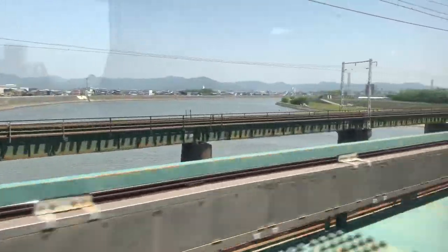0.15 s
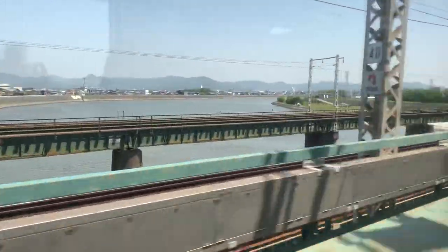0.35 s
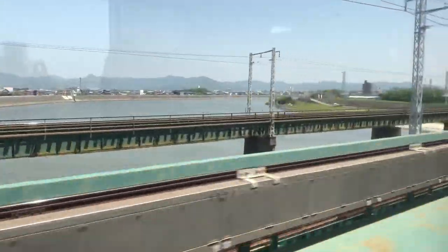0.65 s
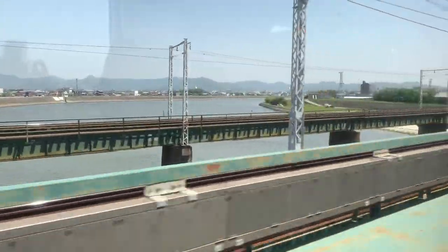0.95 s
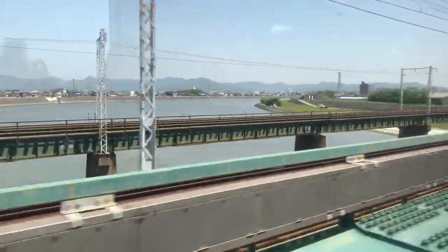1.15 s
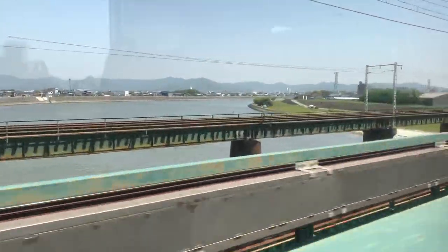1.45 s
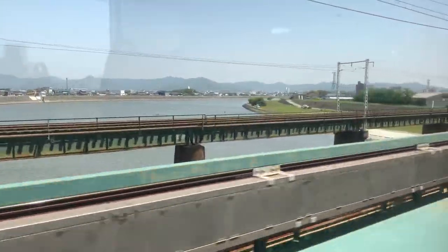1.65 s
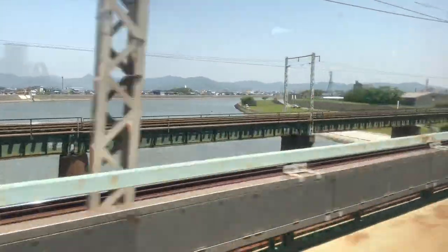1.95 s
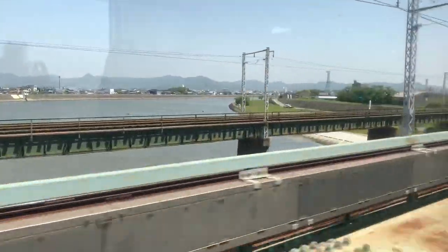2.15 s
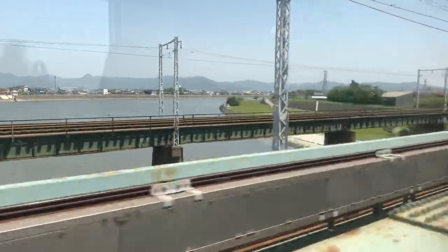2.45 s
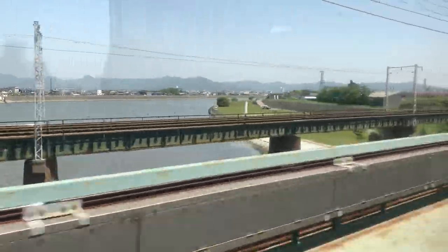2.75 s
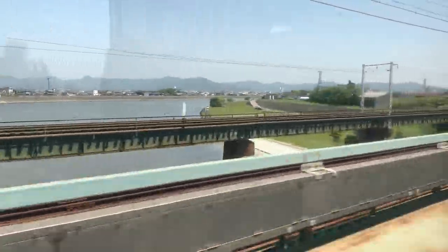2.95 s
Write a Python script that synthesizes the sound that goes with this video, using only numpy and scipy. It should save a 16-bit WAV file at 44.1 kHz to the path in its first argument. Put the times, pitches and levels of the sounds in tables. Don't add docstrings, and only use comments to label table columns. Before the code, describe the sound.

Continuous loud train rumble inside a carriage on a steel bridge, about 3 seconds without a break: deep hollow girder boom, low humming body drone and rough wheel roar. Rounded knocks swell several times a second, strongest near 1.2 and 2.5 s, with short dull plate rings. Faint bright rail hiss lies above; tiny squeaks come around 1.0-1.1, 1.7-2.0 and 2.5-2.6 s, rattling ticks near 0.86, 2.58 and 2.89 s.

```python
import sys
import numpy as np
from scipy import signal
from scipy.fft import rfft, irfft, next_fast_len
from scipy.io import wavfile
from scipy.ndimage import uniform_filter1d, map_coordinates

SR = 44100
rng = np.random.default_rng(int(sys.argv[2]) if len(sys.argv) > 2 else 0)


def inscribe(sig):
    pcm = np.round(np.clip(np.atleast_2d(sig).T, -1, 1) * 32767)
    wavfile.write(sys.argv[1], SR, pcm.astype(np.int16))


def amplitude_ratio(level_db):
    exponent = np.asarray(level_db, float) / 20
    return 10 ** exponent


N = 136710


def unit(x):
    return x / np.sqrt(np.mean(x ** 2) + 1e-20)


def along(points, hz):
    f, level_db = np.transpose(points)
    return np.interp(np.log(hz + 1), np.log(f + 1), level_db, -120, -120)


def wobble(rate):
    knots = rng.standard_normal(int(N * rate / SR) + 4)
    return map_coordinates(knots, [np.arange(N) * rate / SR])


def filtered(x, response):
    m = next_fast_len(N + 8192)
    return irfft(rfft(x, m) * response(np.fft.rfftfreq(m, 1 / SR)), m)[..., :N]


def rush(mid_db, side_db, side_over_db, link, turn, patchy_db):
    z = signal.stft(rng.standard_normal((2, N)), nperseg=512)[2]
    patches = uniform_filter1d(rng.standard_normal(z.shape[1:]), 5, axis=0)
    patches = uniform_filter1d(patches, 10, axis=1)
    shared, own = signal.istft(z * amplitude_ratio(patchy_db * unit(patches)), nperseg=512)[1][:, :N]
    link = np.clip(link, 0, 1)

    def side_tone(hz):
        return amplitude_ratio(along(side_db, hz))

    mid = unit(filtered(shared, lambda hz: amplitude_ratio(along(mid_db, hz))))
    side = link * filtered(shared, lambda hz: side_tone(hz) * np.exp(1j * turn))
    side = side + np.sqrt(1 - link ** 2) * filtered(own, side_tone)
    side = amplitude_ratio(side_over_db) * unit(side)
    return np.array([mid + side, mid - side])


def two_sides(x):
    lag_s, turn_rad = .000178, 3.7

    def half_turn(hz):
        return .5 * (turn_rad - 2 * np.pi * hz * lag_s)

    return filtered(x, lambda hz: np.exp(1j * np.array([half_turn(hz), -half_turn(hz)])))


# t/s, boom level/dB, roar level/dB, hiss level/dB
JOINTS = [(.17, -4, -0.5, -4), (.27, -3.5, -0.5, 3.5), (.4, -4.5, 4, 2), (.53, -2, -11, -6),
          (.7, -0.5, -0.5, -5), (.91, -5.5, -2.5, 5), (1.022, -3, 3, 8.5), (1.179, 1.5, 3, 7),
          (1.27, -8, -4, 1), (1.4, -9, -4, -13), (1.669, -2, 3.5, 6), (1.822, -6.5, 1.5, 5),
          (1.92, -2.5, -0.5, 3.5), (2.222, -3, -4, -5), (2.462, 1, -1.5, 3.5), (2.551, -12, -4, 4.5),
          (2.659, -3, -2, -6), (2.82, -1, -11, -15)]


def knocks(column, dies_s):
    lead_s, rise_s = .038, .04
    rows = np.array(JOINTS)
    since = np.maximum(np.arange(N) / SR - rows[:, :1] + lead_s, 0)
    swell = (1 - np.exp(-since / rise_s)) ** 2 * np.exp(-since / dies_s)
    return 5 * amplitude_ratio(2 * rows[:, column]) @ swell


def roar_lift():
    return knocks(column=2, dies_s=.08)


# f/Hz, level/dB per Hz
BOOM = [(39, -23.5), (66, -1), (91, -6), (140, -2), (183, -2.5), (259, -13), (280, -22), (360, -45),
        (620, -120)]
BOOM_SIDE = [(39, -23), (66, -3), (97, -2), (150, 8), (264, -18), (280, -2.5), (360, -40), (620, -120)]


def girder_boom():
    noise = rush(BOOM, BOOM_SIDE, -12.5, link=.94, turn=2.36, patchy_db=-.7)
    return amplitude_ratio(-20.5) * np.sqrt(1 + knocks(column=1, dies_s=.13)) * noise


# middle t/s, length t/s, f/Hz, peak level/dB
RINGS = [(0.03, 0.1, 190, -18), (0.07, 0.12, 115, -16), (0.232, 0.16, 565.0, -25.0),
         (0.276, 0.2, 624.0, -26.0), (0.313, 0.09, 183.0, -15.0), (0.418, 0.12, 614.0, -26.0),
         (0.424, 0.09, 441.0, -23.0), (0.424, 0.1, 318.0, -20.0), (0.424, 0.19, 183.0, -14.0),
         (0.488, 0.1, 140.0, -15.0), (0.496, 0.08, 307.0, -20.0), (0.496, 0.2, 199.0, -16.0),
         (0.7, 0.1, 318.0, -21.0), (0.836, 0.12, 145.0, -14.0), (0.94, 0.1, 200, -16),
         (1.054, 0.1, 598.0, -25.0), (1.077, 0.1, 199.0, -14.0), (1.112, 0.2, 140.0, -14.0),
         (1.19, 0.1, 275.0, -18.0), (1.196, 0.09, 145.0, -11.0), (1.213, 0.17, 393.0, -23.0),
         (1.248, 0.19, 668.0, -26.0), (1.254, 0.1, 172.0, -13.0), (1.265, 0.2, 318.0, -17.0),
         (1.338, 0.13, 178.0, -14.0), (1.414, 0.08, 145.0, -12.0), (1.451, 0.2, 135.0, -15.0),
         (1.672, 0.09, 151.0, -16.0), (1.698, 0.15, 533.0, -22.0), (1.707, 0.09, 463.0, -22.0),
         (1.744, 0.1, 291.0, -20.0), (1.8, 0.2, 172.0, -14.0), (1.808, 0.15, 468.0, -23.0),
         (1.829, 0.17, 495.0, -23.0), (1.834, 0.1, 151.0, -16.0), (1.881, 0.09, 291.0, -18.0),
         (1.919, 0.13, 554.0, -24.0), (1.942, 0.1, 495.0, -24.0), (2.038, 0.17, 188.0, -16.0),
         (2.075, 0.11, 145.0, -16.0), (2.2, 0.1, 320, -23), (2.284, 0.13, 145.0, -16.0),
         (2.424, 0.13, 145.0, -16.0), (2.54, 0.1, 441.0, -23.0), (2.595, 0.09, 307.0, -20.0),
         (2.601, 0.2, 151.0, -14.0), (2.664, 0.09, 425.0, -23.0), (2.67, 0.12, 161.0, -13.0),
         (2.757, 0.09, 188.0, -14.0), (2.839, 0.09, 151.0, -14.0)]


def girder_plates():
    out = np.zeros((2, N + SR))
    drift = np.pad(.8 * wobble(24.96), (0, SR))
    left_right = np.array([[1], [-1]])
    turns = rng.uniform(-.98, 1, (len(RINGS), 2))
    for (s, length_s, hz, db), (start, turn) in zip(RINGS, turns):
        i = max(int((s - length_s / 2) * SR), 0)
        swell = np.hanning(int(length_s * SR))
        phase = 2 * np.pi * hz * np.arange(len(swell)) / SR + np.pi * start + drift[i:i + len(swell)]
        apart = turn * np.clip(hz / 480, 0, 1) ** 2
        lean = amplitude_ratio(np.interp(hz, [200, 350], [-1.2, .5]) * left_right)
        out[:, i:i + len(swell)] += amplitude_ratio(db - 2.5) * swell * lean * np.sin(phase + apart * left_right)
    return out[:, :N]


# t/s, f/Hz, level/dB
DRONE = [
    (0, 60.7, -21),
    (.45, 59.16, -18),
    (.9, 58.15, -20),
    (1.3, 59.15, -21),
    (1.75, 58.51, -16.5),
    (2.2, 58.45, -23),
    (2.55, 58.5, -19),
    (3.1, 58.54, -18.5),
]
# f/Hz, level/dB per Hz
SWAY = [(18, -52.5), (25, -26), (35, -5), (50, -9), (66, -6.5), (72, -26.5)]


def drone():
    s, hz, db = np.transpose(DRONE)
    t = np.arange(N) / SR
    phase = 2 * np.pi * np.cumsum(np.interp(t, s, hz)) / SR + .48 * wobble(6.8)
    level = np.sqrt(2) * amplitude_ratio(np.interp(t, s, db) + .17 * wobble(8.78))
    hum = level * np.sin(phase) * amplitude_ratio([[-1.2], [1.1]])
    return hum + amplitude_ratio(-30) * rush(SWAY, SWAY, -16, link=.8, turn=3.1, patchy_db=.3)


# f/Hz, level/dB per Hz
ROAR = [(140, -35), (230, -2), (320, -2.5), (365, -6), (485, -5.5), (638, -9), (794, -17.5), (1010, -17.5),
        (1500, -32), (1950, -63), (3300, -120)]
ROAR_SIDE = [(140, -34), (230, 2.5), (269, -9), (392, 3.5), (452, -3.5), (658, -1.5), (1020, -15),
             (1500, -21.5), (1950, -40.5), (3300, -120)]


def wheel_roar():
    noise = rush(ROAR, ROAR_SIDE, -2.5, link=.079, turn=.2, patchy_db=1.7)
    return amplitude_ratio(-25) * np.sqrt(1 + roar_lift()) * noise


# f/Hz, level/dB per Hz
RAIL = [(760, -0.5), (1300, 0.5), (1680, 1), (2270, -1), (3160, -4.5), (3470, -8.5), (4090, -11),
        (6700, -26), (7200, -28), (9360, -62), (15800, -120)]
RAIL_SIDE = [(760, -20), (1300, -1), (1530, -8), (1740, -3), (2660, -8.5), (3140, -9.5), (3540, -14.5),
             (5070, -24.5), (7200, -28), (9360, -60.5), (15800, -120)]


def rail_song():
    level = amplitude_ratio(-38 + .42 * wobble(7.82))
    lift = .12 * roar_lift() + .1 * knocks(column=3, dies_s=.08)
    return level * np.sqrt(1 + lift) * rush(RAIL, RAIL_SIDE, .3, link=.3, turn=1.87, patchy_db=.5)


def wall_panel():
    panel_hz, width_hz = 323, 13

    def ring(f):
        return 1j * f * width_hz / (panel_hz ** 2 - f * f + 1j * f * width_hz)

    noise = unit(filtered(rng.standard_normal(N), lambda f: ring(f) ** 2))
    return amplitude_ratio(-38) * np.sqrt(1 + roar_lift()) * noise


# middle t/s, length t/s, f/Hz, octave level/dB, fundamental over octave level/dB
SQUEAKS = [(.997, .04, 2362, -49, 3), (1.015, .035, 2390, -56, 13), (1.048, .065, 2318, -51, 17),
           (1.082, .045, 2362, -52, 7), (1.1, .03, 2270, -60, 13), (1.12, .03, 2380, -57, 12),
           (1.138, .045, 2345, -56, 19), (1.075, .14, 4660, -60, -20), (1.07, .1, 3430, -59, -20),
           (1.2, .025, 1850, -60, 24), (1.715, .06, 2748, -51, -6), (1.752, .06, 2760, -49, -6),
           (1.82, .05, 1575, -44, -6), (1.96, .06, 2160, -52, -4), (1.985, .08, 2020, -53, 0),
           (2.497, .055, 1968, -47, 2), (2.523, .05, 2190, -52.5, 6), (2.545, .065, 2215, -55, 16),
           (2.577, .04, 2140, -60, 17), (2.618, .04, 2140, -63, 15)]
OVERTONES_DB = [-14, -15]


def squeaks():
    notes = np.zeros(N)
    bend = 1 + .008 * wobble(70)
    for s, length_s, hz, db, first_db in SQUEAKS:
        swell = np.hanning(int(length_s * SR))
        i = int((s - length_s / 2) * SR)
        phase = 2 * np.pi * hz * np.cumsum(bend[i:i + len(swell)]) / SR
        levels_db = [first_db, 0, *OVERTONES_DB]
        tone = sum(amplitude_ratio(level) * np.sin((k + 1) * phase) for k, level in enumerate(levels_db))
        notes[i:i + len(swell)] += amplitude_ratio(db + 4.5) * swell * tone
    return notes


# t/s, length t/s, level/dB
RATTLES = [
    (.385, .015, -56),
    (.634, .015, -53),
    (.862, .05, -44),
    (1.69, .07, -56),
    (2.03, .015, -54),
    (2.578, .022, -46),
    (2.887, .028, -51),
]
# f/Hz, level/dB per Hz
RATTLE = [(2500, -16), (4500, 4), (6300, 5), (8500, 0), (10800, -4), (11800, -12), (13500, 1), (15600, -10)]


def rattles():
    shake = np.zeros(N)
    for s, length_s, db in RATTLES:
        t = np.arange(int(3 * length_s * SR)) / SR
        burst = (1 - np.exp(-t / .0051)) * np.exp(-(t / length_s) ** 2)
        shake[int(s * SR):][:len(t)] += amplitude_ratio(db) * burst
    near = rush(RATTLE, RATTLE, 0, link=0, turn=0, patchy_db=2.5)[0]
    far = rush(RATTLE, RATTLE, 0, link=0, turn=0, patchy_db=5)
    return shake * amplitude_ratio(1.1 * wobble(200)) * (unit(two_sides(near)) + .55 * unit(far))


def trim():
    notes, ticks = squeaks(), rattles()
    rough_db = 3.5 * np.array([wobble(65), wobble(70)]) + [[-1], [1]]
    return two_sides(notes) * amplitude_ratio(rough_db) + ticks


# f/Hz, level/dB per Hz
HISS = [(4180, -31), (7100, -4), (9000, -1), (10600, -5), (11300, -18.5), (11700, -55), (12100, -14),
        (12700, -9.5), (15400, -14)]
HISS_SIDE = [(4060, -28), (6900, -8.5), (8330, 0.5), (9310, -16), (10100, -6), (11200, -1), (13000, -9),
             (13900, -38.5), (15400, -25.5)]


def window_seals():
    level = amplitude_ratio(-60.5 + 1.5 * wobble(14.07))
    lift = knocks(column=3, dies_s=.05)
    return level * np.sqrt(1 + lift) * rush(HISS, HISS_SIDE, -2.2, link=.97, turn=1.6, patchy_db=-1.5)


def scene():
    rolling = drone() + girder_boom() + wheel_roar() + rail_song() + wall_panel()
    return rolling + window_seals() + trim() + girder_plates()


def roll_off(x):
    return signal.sosfilt(signal.butter(12, 15590, fs=SR, output="sos"), x)


def record(dry):
    notch_hz, width_hz = 7270, 290
    shared = dry.mean(axis=0) * signal.windows.tukey(N, .02)
    lost = filtered(shared, lambda hz: np.exp(-((hz - notch_hz) / width_hz) ** 4))
    lost = lost * np.clip(.7 + .3 * wobble(16), 0, 1)
    ceiling = (1 + np.abs(dry) ** 6) ** (1 / 6)
    mix = (dry - lost) * signal.windows.tukey(N, .001) / ceiling
    return roll_off(mix)


dry = scene()
out = record(dry)
inscribe(out)
```